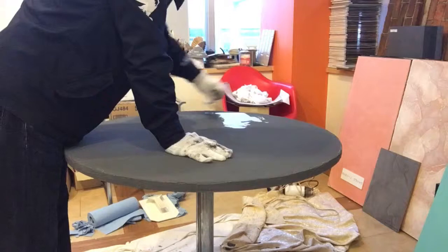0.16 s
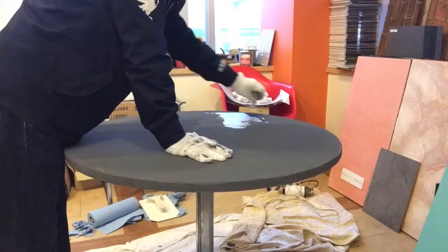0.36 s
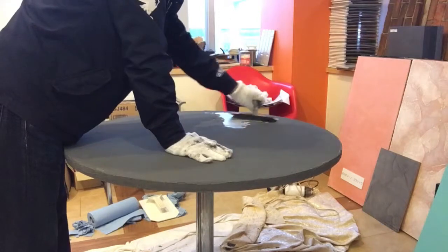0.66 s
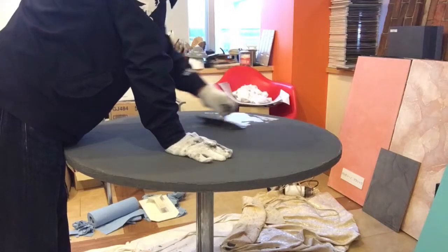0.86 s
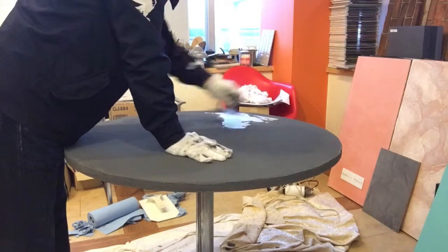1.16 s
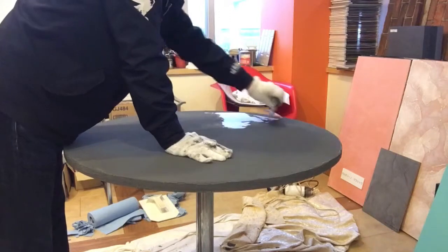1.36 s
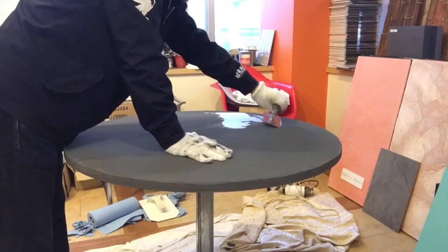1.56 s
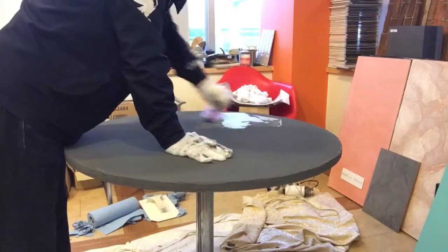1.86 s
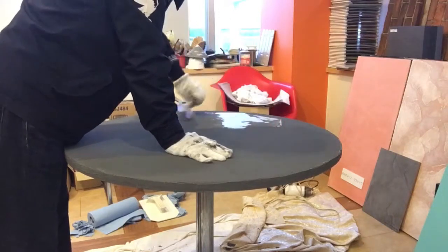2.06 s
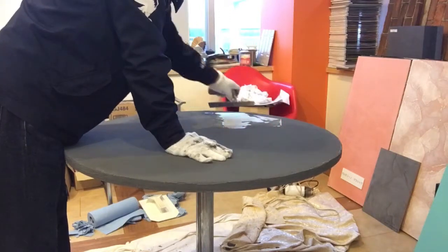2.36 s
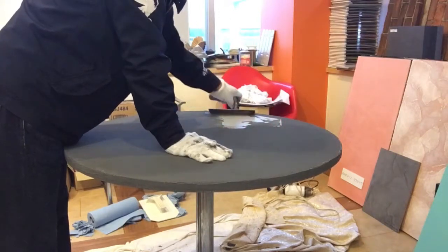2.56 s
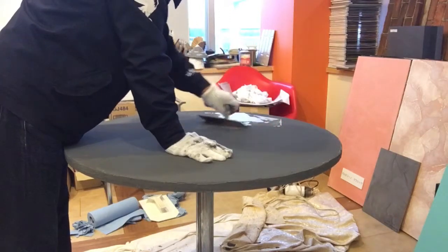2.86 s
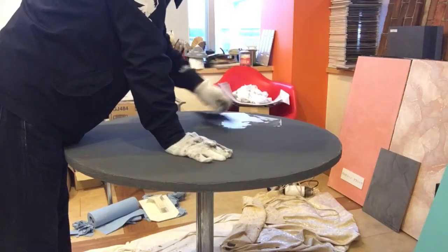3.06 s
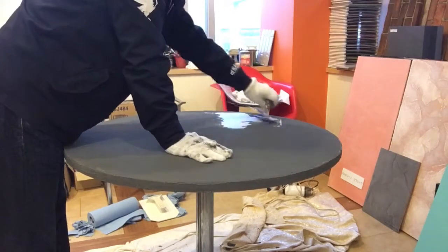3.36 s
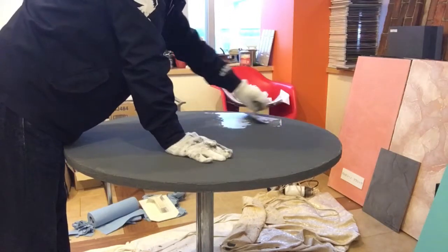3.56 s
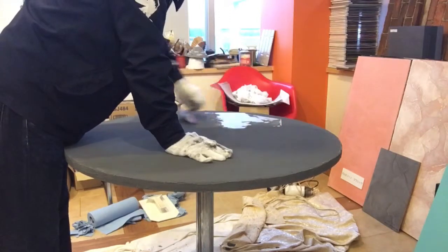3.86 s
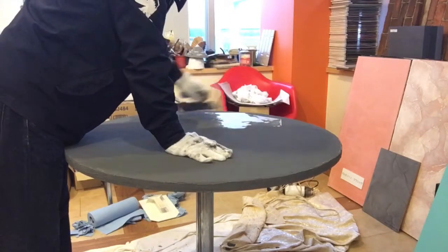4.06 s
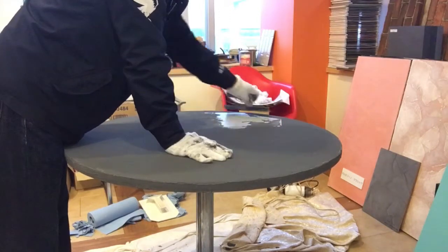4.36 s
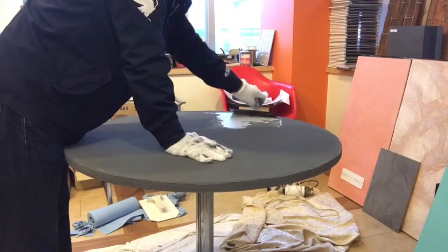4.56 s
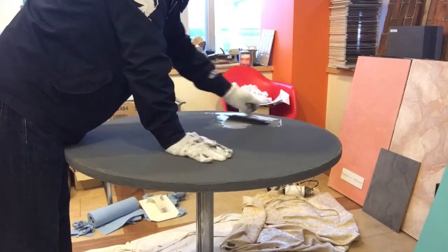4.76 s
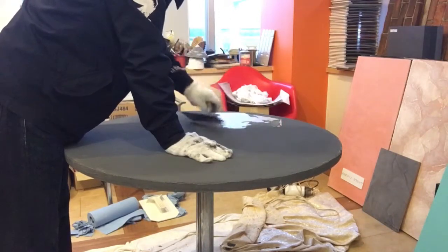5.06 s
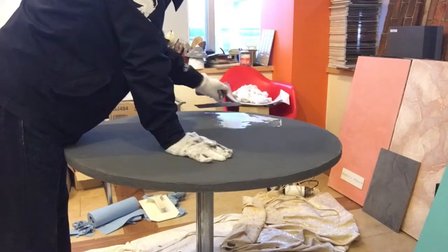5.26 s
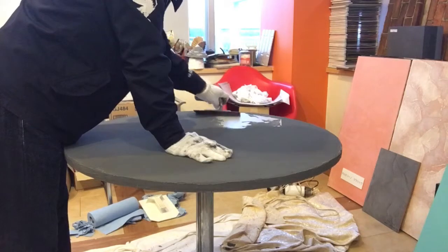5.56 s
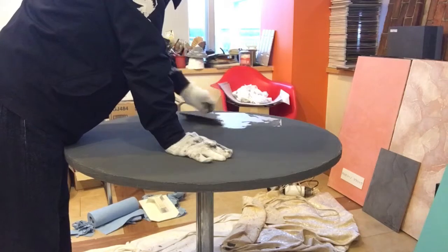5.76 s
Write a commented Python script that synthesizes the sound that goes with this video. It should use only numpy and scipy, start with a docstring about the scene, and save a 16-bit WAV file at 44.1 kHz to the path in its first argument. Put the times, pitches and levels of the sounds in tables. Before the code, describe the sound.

Heard close up in a small workshop, a metal trowel drags over a sandy tabletop in a steady rhythm: the tail of one stroke, then six half-second scrapes with short gaps. The blade taps down, rasps and hisses across the grains while the table resonates, then lifts, at times with a faint ring. Very soft sleeve rustle marks the backswings over a faint electrical hum.

```python
"""A tick and a gritty rasp: a steel trowel ends one stroke over a coated tabletop, then makes six more.
Drawn by a gloved hand, the blade knocks as it lands, snaps over sand grains and sets the top droning.
After some strokes it rings faintly in the air, and a sleeve rustles as the arm swings back.
A low mains hum lies under it all, in a small workshop heard through one close microphone."""
import sys
import numpy as np
from scipy import signal
from scipy.fft import rfft, irfft, next_fast_len
from scipy.io import wavfile
from scipy.ndimage import uniform_filter1d

SR = 44100
rng = np.random.default_rng(int(sys.argv[2]) if len(sys.argv) > 2 else 0)


def unload_wav(signal):
    """Save mono or channel-first audio to the path in sys.argv[1] as 16-bit WAV at rate SR, clipped to [-1, 1]."""
    wavfile.write(
        sys.argv[1],
        SR,
        np.round(np.clip(np.atleast_2d(signal).T, -1, 1) * 32767).astype(np.int16),
    )


N = 259749
TIME = np.arange(N) / SR
PADDED = next_fast_len(N + SR)
GRID_HZ = np.maximum(np.fft.rfftfreq(PADDED, 1 / SR), 1)

# Room tone of the still air. Each row: frequency in Hz, relative level in dB.
AIR_SPECTRUM = [(25, -40), (44, 0), (70, -6), (150, -10.5), (300, -11), (700, -20.5), (1500, -22.5),
                (3000, -24.5), (6000, -32.5), (10000, -45), (16000, -41.5)]
# Partials of the mains hum. Each row: frequency in Hz, rms level in dB.
HUM_PARTIALS = [(119.6, -67), (240, -99.5)]
# The workshop's reverb tail. Each row: frequency in Hz, seconds to fall by 60 dB.
ROOM_DECAY = [(200, 0.36), (530, 0.48), (1400, 0.37), (3200, 0.41), (5000, 0.36), (10000, 0.41),
              (16000, 0.33)]
# Pulls of the trowel, the first already under way. Each row: landing in seconds, length in seconds,
# base level in dB, skim time in seconds, bite time in seconds, extra hiss in dB, mid-stroke flex pitch
# in Hz, its glide in Hz per second, corner zing in dB, table sway in dB.
STROKES = [(-0.4, 0.58, -25, 0.05, 0.02, 5.5, 1361, -100, -25, -75),
           (0.614, 0.53, -22, 0.052, 0.004, 3.9, 1810, 60, -22.5, -57.5),
           (1.596, 0.58, -24.5, 0.084, 0.018, 2, 1768, -300, -28, -55),
           (2.568, 0.54, -21, 0.11, 0.019, 3.9, 1578, 906.5, -21, -49.5),
           (3.511, 0.6, -24, 0.053, 0.023, 4, 1615, -330, -24, -61),
           (4.538, 0.6, -22.5, 0.091, 0.03, 5, 1806, 27, -20.5, -67),
           (5.499, 0.5, -21, 0.1, 0.027, 3.9, 1720, 58, -29, -77)]
# The blade knocks on the top and rebounds. Each row: start in seconds, relative level in dB,
# treble lift in dB, gain of the dull knock in dB.
TOUCHES = [(0.078, -17.5, -12, -14), (0.617, -32.5, 14, -15), (0.629, -27.5, 2.5, -4),
           (0.657, -27, -3, -10), (1.575, -40.5, -16, -4), (1.599, -31, -4, 2), (2.571, -19.5, -0.5, -3),
           (2.607, -32, -1, 0), (3.114, -36, 8, -11), (3.492, -34.5, -3, -6), (3.521, -35.5, 3, -10.5),
           (4.547, -30.5, 0, -7), (4.611, -26.5, 1, -5), (5.494, -38.5, -1, -0.5), (5.506, -32, -23, 0),
           (5.544, -34, -19, 4)]
# The blade springs free. Each row: start in seconds, ring level in dB, seconds to fall by 60 dB.
LIFTS = [(1.08, -35.5, 0.65), (2.099, -46, 9.8), (4.059, -43, 1.13), (5.121, -49, 1.7)]
# The hand leans in. Each row: centre in seconds, extra drive in dB, half-width in seconds.
PRESSES = [(0.98, 2.5, 0.044), (2.02, 4, 0.083), (3.66, 2, 0.039), (3.93, 3.5, 0.065), (5.03, 1, 0.022),
           (5.73, 2, 0.022)]
# The edge catches and the drone swells. Each row: centre in seconds, boost in dB, half-width in seconds.
CATCHES = [(0.09, 19.5, 0.046), (0.96, 15.5, 0.034), (1.75, 11.5, 0.1), (2.02, 7.5, 0.085),
           (3.0, 14, 0.066), (3.69, 10, 0.057), (3.83, 9, 0.025), (4.05, 9.5, 0.042), (4.58, 11.5, 0.038),
           (4.73, 9, 0.041), (5.04, 8, 0.094), (5.68, 4.5, 0.04), (5.83, 5.5, 0.029)]
# The edge crosses sharp grit. Each row: centre in seconds, level in dB, half-width in seconds.
SHARP_PATCHES = [(0.925, -21, 0.063), (2.844, -22.5, 0.1), (4.812, -22.5, 0.054), (5.736, -28.5, 0.15)]
# The top's voice under a knock. Each row: frequency in Hz, width in Hz, relative gain in dB.
KNOCK_MODES = [(154, 19, 9), (349, 27, -22), (570, 690, 6), (830, 460, -10)]
# The top's voice under the dragging edge. Each row: frequency in Hz, width in Hz, relative gain in dB.
DRONE_MODES = [(339.6, 3.1, 17.5), (337.2, 18, 6), (357, 6.6, -11)]
# Tone colour of steel on grit. Each row: frequency in Hz, relative level in dB.
RASP_SPECTRUM = [(150, -63.5), (420, -33), (560, -15), (780, -14.5), (1000, -7), (1500, -6), (2100, -3.5),
                 (2600, -5.5), (4600, -21), (4950, -22.5), (6600, -22), (9600, -25), (10400, -29),
                 (15800, -26)]
# Broad resonances of blade and handle. Each row: frequency in Hz, width in Hz, lift in dB.
BLADE_PEAKS = [(1210, 160, 1.5), (3980, 190, 4), (4520, 610, 7.5), (5830, 1800, 11.5), (11300, 430, 4)]
# Bending modes of the pressed blade. Each row: frequency in Hz, width in Hz, relative gain in dB.
BENDING_MODES = [(911, 95, -2.5), (1277, 110, 4), (1416, 81, 0), (1584, 162, 8), (1759, 45, -9.5),
                 (2130, 41, -3.5), (2206, 34, -9), (2726, 110, -4.5), (3124, 130, -1)]
# The band where the blade's corner zings: low edge in Hz, high edge in Hz.
CORNER_BAND = [2317, 3070]

OPEN_S, CUTOFF_HZ = 0.075, 15800
RELEASE_S = 0.12   # the pressure eases over the end of each stroke


def from_db(db):
    """Decibels to gain."""
    return 10 ** (np.asarray(db) / 20)


def rms_one(x):
    """Scale to rms 1."""
    return x / np.sqrt(np.mean(x ** 2) + 1e-20)


def at_hz(points, hz):
    """Read a table on a log-frequency axis."""
    knots, values = np.transpose(points)
    return np.interp(np.log(hz), np.log(knots), values)


def colour(x, gain_db):
    """Minimum-phase EQ with the given gain on the frequency grid."""
    cepstrum = irfft(np.log(from_db(gain_db)), PADDED)
    cepstrum[1:PADDED // 2] *= 2
    cepstrum[PADDED // 2 + 1:] = 0
    return irfft(rfft(x, PADDED) * np.exp(rfft(cepstrum)), PADDED)[:N]


def cut(x, hz, kind, order=4):
    """Butterworth filter."""
    return signal.sosfilt(signal.butter(order, hz, kind, fs=SR, output="sos"), x)


def resonator(hz, width_hz):
    """Filter coefficients of one resonance, gain 1 at its peak."""
    r = np.exp(-np.pi * width_hz / SR)
    return np.array([1, 0, -1]) * (1 - r * r) / 2, [1, -2 * r * np.cos(2 * np.pi * hz / SR), r * r]


def resonate(x, hz, width_hz):
    """Ring one resonance with x."""
    return signal.lfilter(*resonator(hz, width_hz), x)


def modes(x, rows):
    """Ring a body's resonances side by side."""
    return sum(from_db(db) * resonate(x, hz, width) for hz, width, db in rows)


def drift(per_s):
    """A random wander of rms 1, with per_s new targets a second."""
    return rms_one(np.interp(TIME * per_s, np.arange(N), rng.standard_normal(N)))


def bump(centre_s, half_width_s):
    """A bell-shaped rise and fall of height 1."""
    return np.exp(-((TIME - centre_s) / half_width_s) ** 2)


def swells(rows):
    """Extra dB that come and go around each row's time."""
    return sum(db * bump(s, half_width) for s, db, half_width in rows)


def evened(x, window_s):
    """Ride the gain to flatten slow changes of level."""
    power = np.abs(uniform_filter1d(rms_one(x) ** 2, size=int(window_s * SR)))
    return x / np.sqrt(power + .01)


def stroke_now():
    """The columns of the latest stroke, at every moment."""
    rows = np.array(STROKES)
    latest = np.maximum(np.searchsorted(rows[:, 0], TIME, side="right") - 1, 0)
    return rows[latest].T


def room_tone(air_db):
    """The bed: still air and mains hum."""
    air = cut(colour(rng.standard_normal(N), at_hz(AIR_SPECTRUM, GRID_HZ)), 28, "high", order=8)
    hum = sum(np.sqrt(2) * from_db(db) * np.sin(2 * np.pi * hz * TIME) for hz, db in HUM_PARTIALS)
    return from_db(air_db) * rms_one(air) + hum


def workshop_reverb(x, first_echo_s, treble_loss_db):
    """A short, diffuse tail that starts weaker in the treble; each band dies at its own rate."""
    t = TIME[:SR * 3 // 4]
    edges = np.geomspace(100, 18000, 13)
    response = np.zeros(len(t))
    for low, high in zip(edges, edges[1:]):
        hz = np.sqrt(low * high)
        band = cut(rng.standard_normal(len(t)), [low, high], "band", order=3)
        response += band * from_db(-60 * t / at_hz(ROOM_DECAY, hz) - treble_loss_db * hz / CUTOFF_HZ)
    response *= t > first_echo_s
    return signal.fftconvolve(x, response / np.sqrt(np.sum(response ** 2)))[:N]


def moving_echoes(x, spots):
    """The echoes crossfade from spot to spot as the blade crosses the table and returns through the air."""
    turns_s = np.ravel([(lands, lands + length) for lands, length, *_ in STROKES])
    position = np.interp(TIME, turns_s, [0, 1] * len(STROKES)) * (spots - 1)
    shares = [np.sqrt(np.maximum(1 - np.abs(position - spot), 0)) for spot in range(spots)]
    return sum(workshop_reverb(x * share, first_echo_s=0.0037, treble_loss_db=13.5) for share in shares)


def sleeve(band_hz, level_db, lead_s):
    """Soft, uneven cloth rustle as the arm swings back before each landing."""
    rustle = rng.standard_normal(N) * from_db(2 * np.tanh(drift(60)))
    cloth = cut(cut(rustle, band_hz, "band", order=1), 10500, "low", order=2)
    swings = sum(bump(lands - lead_s, 0.16) for lands, *_ in STROKES)
    return from_db(level_db) * swings * rms_one(cloth)


def table_sway(hz, lag_s):
    """A sub-bass swell: the table rocks on its pedestal as the hand comes down."""
    level = sum(from_db(sway_db) * bump(lands + lag_s, 0.057) for lands, *_, sway_db in STROKES)
    return level * np.sin(2 * np.pi * hz * TIME)


def free_ring(hz):
    """Lifted off, the blade sings on one mode until it fades or lands again."""
    level = np.zeros(N)
    for s, db, t60 in LIFTS:
        lands = min(start for start, *_ in STROKES if start > s)
        level += from_db(db - 60 * np.abs(TIME - s) / t60) * (TIME >= s) * (TIME < lands)
    return uniform_filter1d(level, size=200) * np.sin(2 * np.pi * hz * TIME)


def table_drone(force, flutter_db, flutters_per_s):
    """The dragging edge keeps the top's modes swinging, with a flutter as it grips and slips."""
    wood = cut(modes(force, DRONE_MODES), [250, 450], "band", order=2)
    return evened(wood, window_s=0.039) * from_db(flutter_db * np.tanh(drift(flutters_per_s)))


def through_blade(x):
    """What the pressed blade radiates when x shakes its edge."""
    peaks_db = sum(db / (1 + (2 * (GRID_HZ - hz) / width) ** 2) for hz, width, db in BLADE_PEAKS)
    return colour(x, at_hz(RASP_SPECTRUM, GRID_HZ) + peaks_db)


def blade_knocks(decay_s, trim_db):
    """Each touch crushes a few grains: a short crunch through the blade, a dull knock in the top."""
    shake = rng.standard_normal(N)
    crunch = rms_one(through_blade(shake))
    treble = crunch - cut(crunch, 3600, "low", order=1)
    steel, push = np.zeros(N), np.zeros(N)
    for s, db, treble_db, knock_db in TOUCHES:
        fade = from_db(db + trim_db) * (TIME >= s) * np.exp(-np.abs(TIME - s) / decay_s)
        steel += fade * (crunch + (from_db(treble_db) - 1) * treble)
        push += fade * shake * from_db(knock_db)
    return steel + cut(modes(push, KNOCK_MODES), 1100, "low", order=2)


def grains(per_s, size_db, judder_db, judders_per_s, friction):
    """The edge snaps over mixed sand grains on top of smooth friction, in clumps as it judders."""
    sizes = from_db(size_db * np.minimum(rng.exponential(1, N), 4)) * rng.choice([-1, 1], N)
    snaps = rms_one(sizes * (rng.random(N) < per_s / SR))
    return (snaps + friction * rng.standard_normal(N)) * from_db(judder_db * drift(judders_per_s))


def sharp_grit(hz, width_hz, broad_share):
    """Once the edge has bitten, patches of sharper grains sizzle around one high blade resonance."""
    lands, length, _, skim_s, *_ = stroke_now()
    biting = (TIME > lands + skim_s) * (TIME < lands + length - RELEASE_S / 2)
    gate = uniform_filter1d(1.0 * biting, size=2000)
    force = grains(per_s=5000, size_db=1.0, judder_db=-3.5, judders_per_s=200, friction=0.28)
    steel = cut(through_blade(force), [3300, 9000], "band", order=2)
    level = sum(from_db(db) * bump(s, half_width) for s, db, half_width in SHARP_PATCHES)
    return gate * level * rms_one(resonate(steel, hz, width_hz) + broad_share * steel)


def corner_zing(force, lift_s, level_db):
    """Just before the lift only the corner drags, so the blade is less damped and zings."""
    zing = rms_one(cut(force, CORNER_BAND, "band", order=3))
    return zing * from_db(level_db) * bump(lift_s - 0.08, 0.03)


def bending(x, flare_db, flares_per_s, trim_db):
    """The grit bites at ever new spots on the edge, so each bending mode flares and fades by itself."""
    flares = np.zeros(N)
    for hz, width, db in BENDING_MODES:
        wander_db = flare_db * np.tanh(drift(flares_per_s))
        flares += resonate(x, hz, width) * from_db(db + trim_db + wander_db)
    return x + flares


def flexing(x, centre_hz, width_hz, mix):
    """Add a resonance that glides with the blade's flex, retuned every few milliseconds."""
    ring, state = np.zeros(N), np.zeros(2)
    for i in range(0, N, 128):
        block = slice(i, i + 128)
        ring[block], state = signal.lfilter(*resonator(centre_hz[i], width_hz), x[block], zi=state)
    return x + mix * ring


def effort(age, length, skim_s, bite_s, hop_db=12.5, skim_db=12, gather_db_per_s=4, release_db=25):
    """Drive in dB: the edge hops before a knock, skims, bites, speeds up, is leant on and eases off."""
    hopping = np.max([bump(s, 0.012) * (TIME < s) for s, *_ in TOUCHES], axis=0)
    skimming = (1 - np.tanh((age - skim_s) / (2 * bite_s))) / 2
    easing = np.clip(1 + (age - length) / RELEASE_S, 0, 1) ** 2
    gathering_db = gather_db_per_s * (age - length / 2)
    return gathering_db - hop_db * hopping - skim_db * skimming - release_db * easing + swells(PRESSES)


def scrape(lift_off_s):
    """One stream of grains drives rasp, grit, hiss, drone and zing; more effort sounds brighter."""
    lands, length, level_db, skim_s, bite_s, hiss_db, flex_hz, glide, zing_db, _ = stroke_now()
    age = TIME - lands
    drive_db = effort(age, length, skim_s, bite_s)
    contact = np.exp(-np.maximum(age - length, 0) / lift_off_s)
    force = grains(per_s=8000, size_db=2.0, judder_db=1.0, judders_per_s=260, friction=0.64)
    steel = bending(through_blade(force), flare_db=10.5, flares_per_s=16, trim_db=-3.5)
    steel = flexing(steel, flex_hz + glide * (age - length / 2), width_hz=200, mix=0.91)
    rasp = evened(cut(steel, 3500, "low"), window_s=0.079)   # the bending modes share one push
    grit = cut(steel, [3500, 8500], "band")
    hiss = cut(steel, 8500, "high")
    drone = table_drone(force, flutter_db=2.0, flutters_per_s=14)
    layers = [(rasp, -0.06 + drive_db),
              (grit, -4.5 + 1.11 * drive_db),
              (hiss, -11.5 + 1.43 * drive_db + hiss_db),
              (drone, -32.5 + 0.19 * drive_db + swells(CATCHES))]
    dragging = contact * sum(rms_one(x) * from_db(level_db + db) for x, db in layers)
    return dragging + corner_zing(force, lands + length, zing_db)


def scene():
    """Trowel up front, echoes and room tone behind, the same in both channels."""
    trowel = scrape(lift_off_s=0.009) + blade_knocks(decay_s=0.012, trim_db=-1.5)
    trowel += sharp_grit(hz=6070, width_hz=830, broad_share=0.8)
    mono = trowel + from_db(-8.0) * moving_echoes(trowel, spots=5)
    mono += free_ring(hz=1480) + table_sway(hz=43.7, lag_s=0.09)
    mono += sleeve(band_hz=[398, 2610], level_db=-61, lead_s=0.21) + room_tone(air_db=-63)
    return np.stack([mono, mono])


def record(dry):
    """The microphone opens just after the start; a steep low-pass takes off the highest treble."""
    top_cut = signal.ellip(12, .1, 80, CUTOFF_HZ, fs=SR, output="sos")
    return signal.sosfilt(top_cut, dry * (TIME >= OPEN_S) + 1e-18)


dry = scene()
out = record(dry)
unload_wav(out)
```